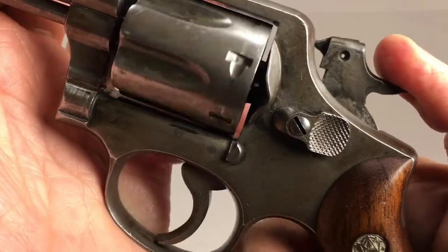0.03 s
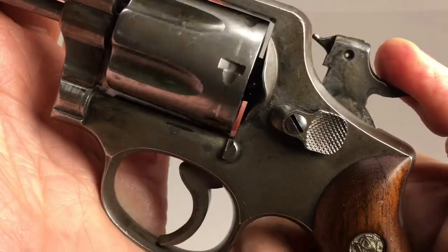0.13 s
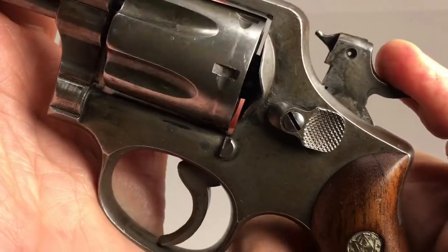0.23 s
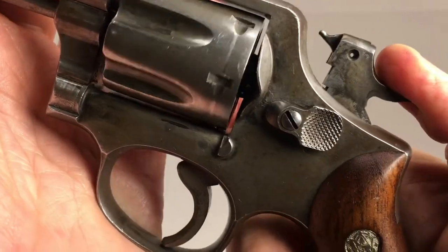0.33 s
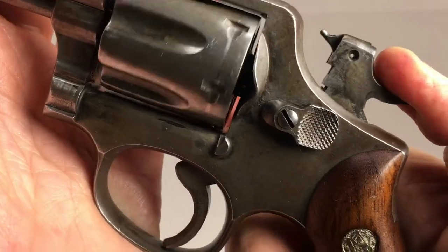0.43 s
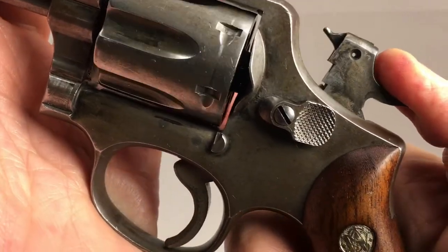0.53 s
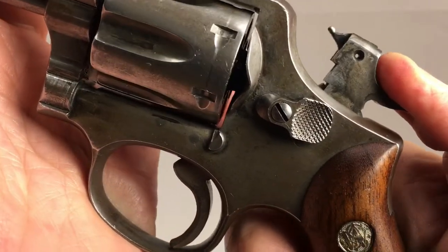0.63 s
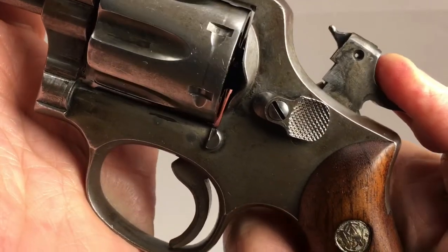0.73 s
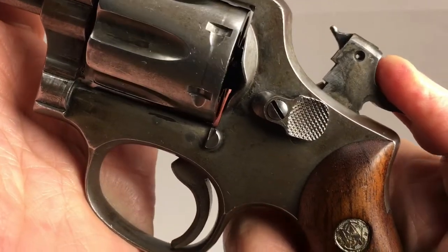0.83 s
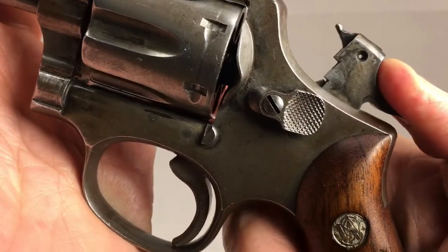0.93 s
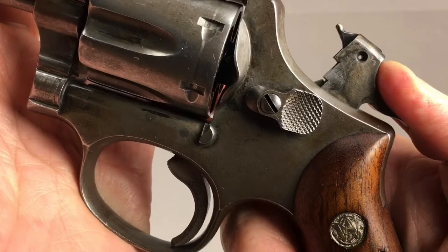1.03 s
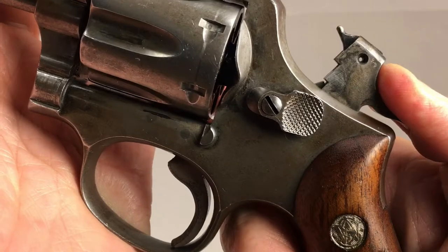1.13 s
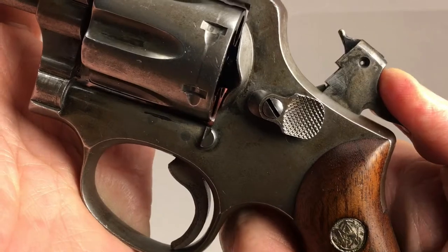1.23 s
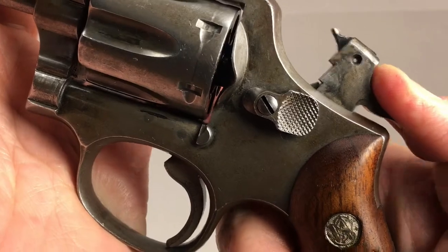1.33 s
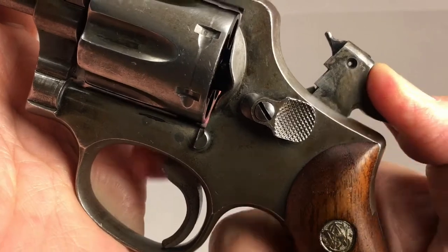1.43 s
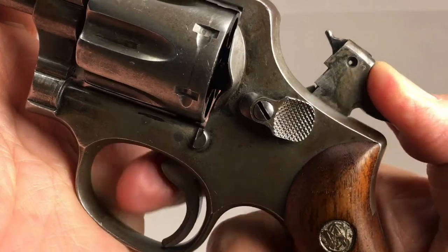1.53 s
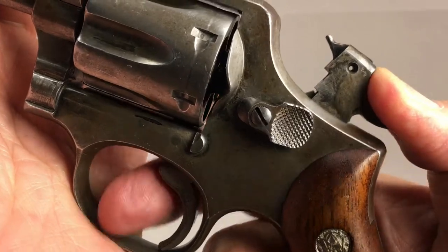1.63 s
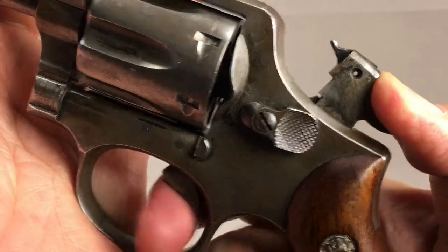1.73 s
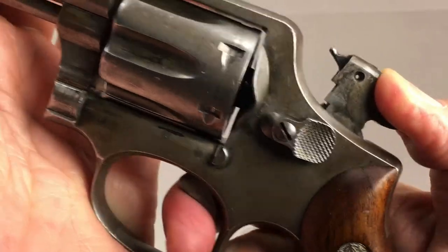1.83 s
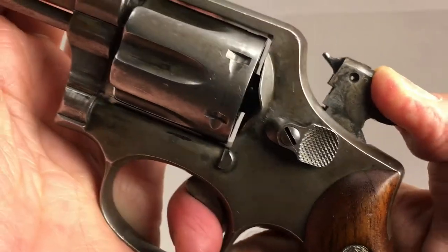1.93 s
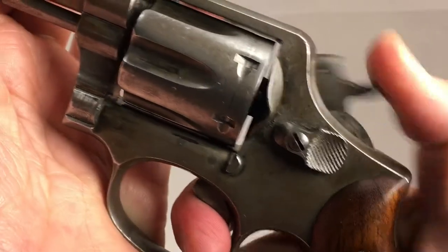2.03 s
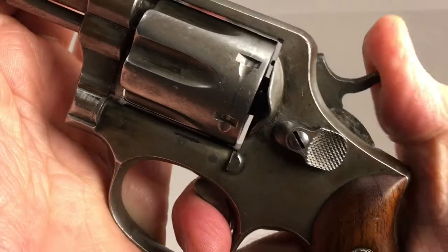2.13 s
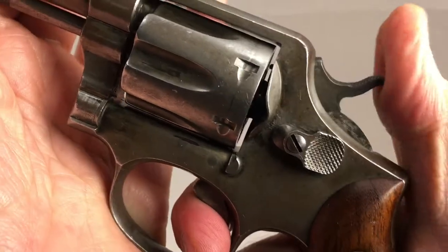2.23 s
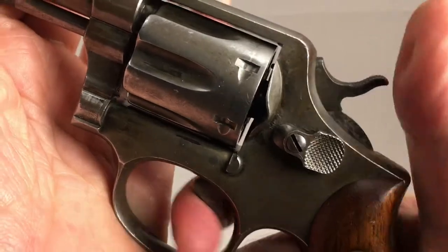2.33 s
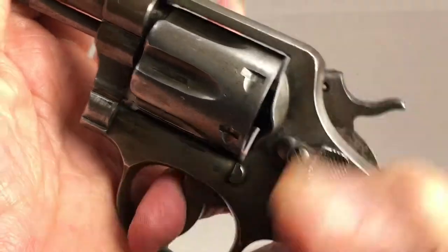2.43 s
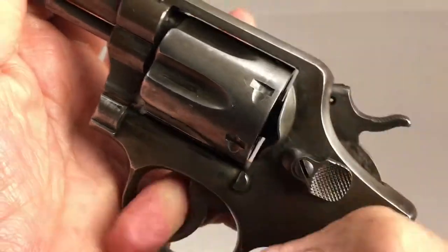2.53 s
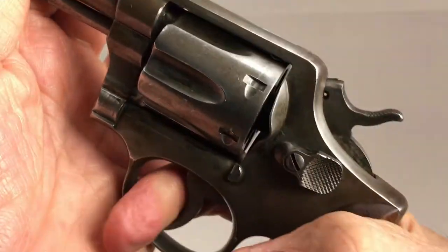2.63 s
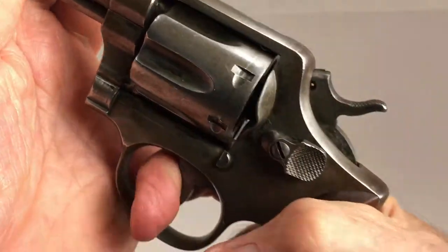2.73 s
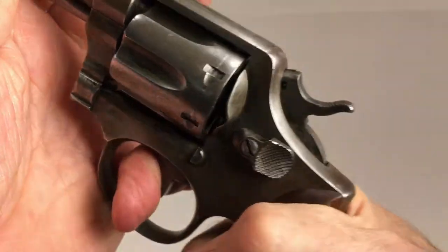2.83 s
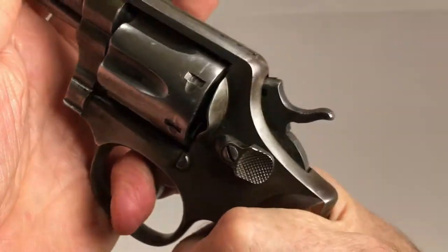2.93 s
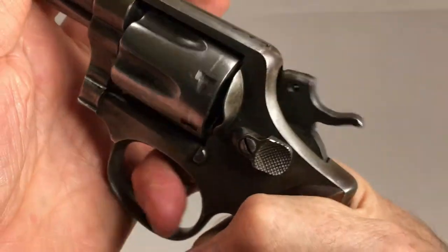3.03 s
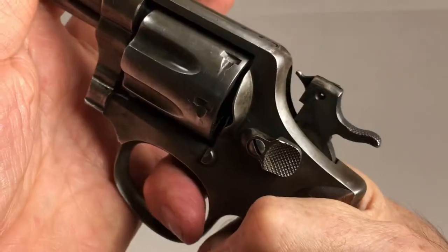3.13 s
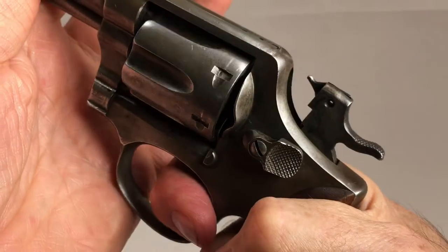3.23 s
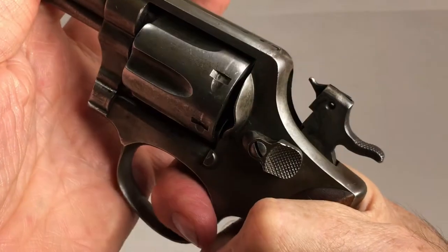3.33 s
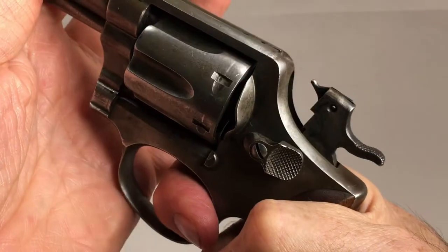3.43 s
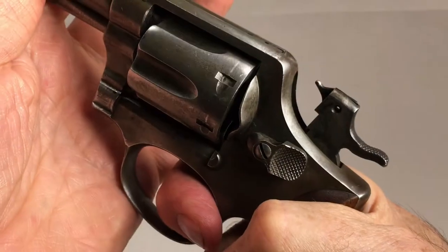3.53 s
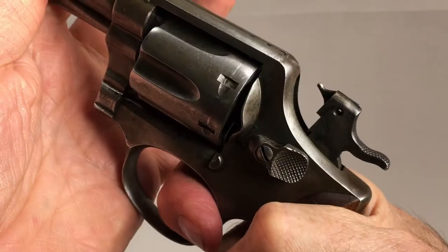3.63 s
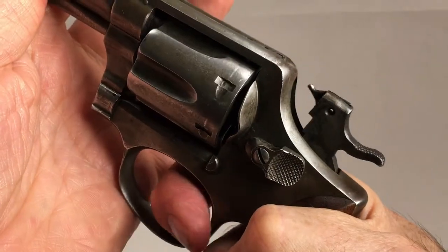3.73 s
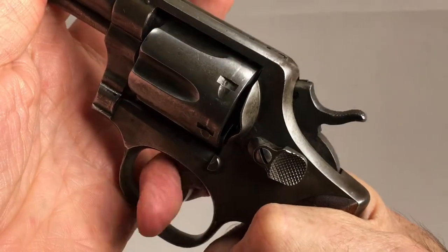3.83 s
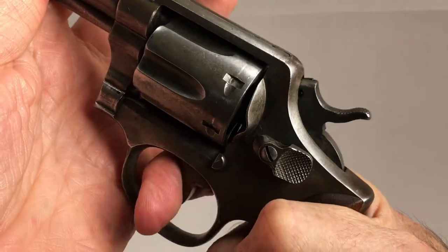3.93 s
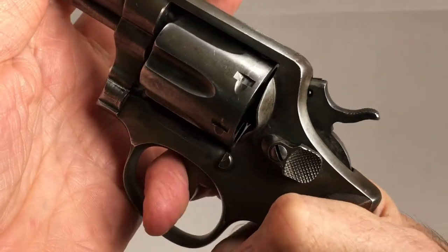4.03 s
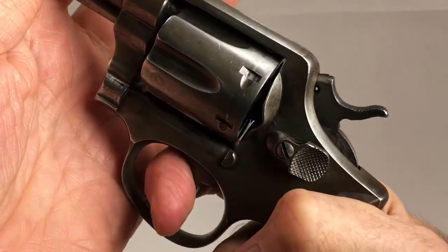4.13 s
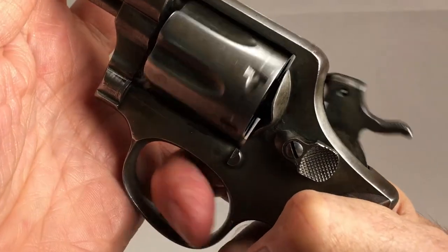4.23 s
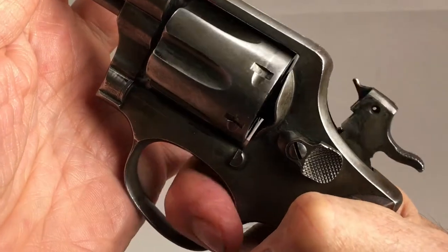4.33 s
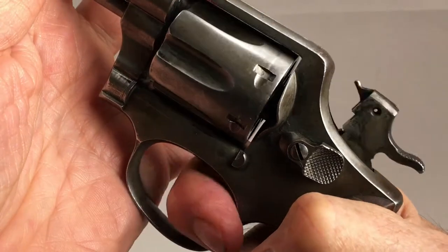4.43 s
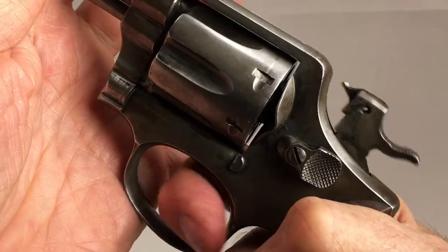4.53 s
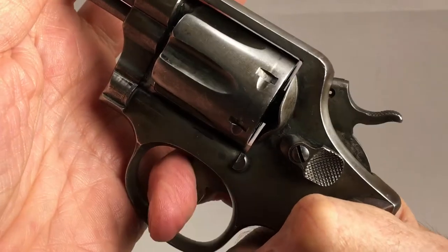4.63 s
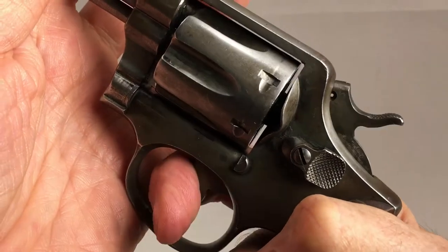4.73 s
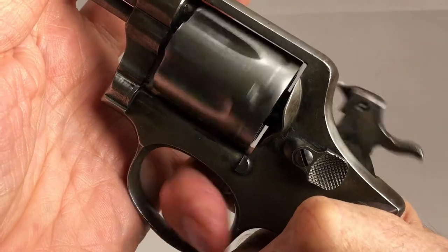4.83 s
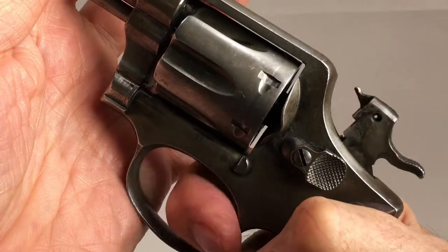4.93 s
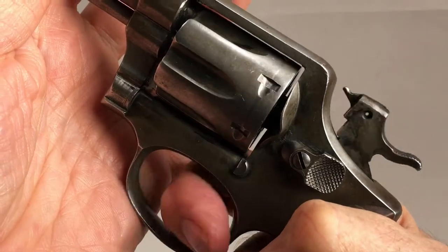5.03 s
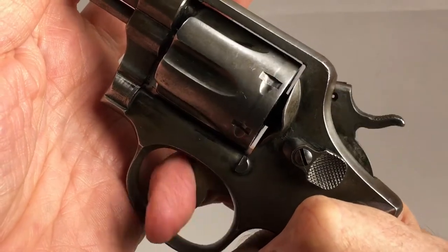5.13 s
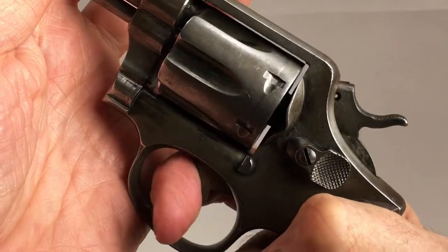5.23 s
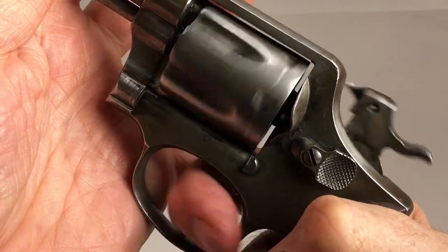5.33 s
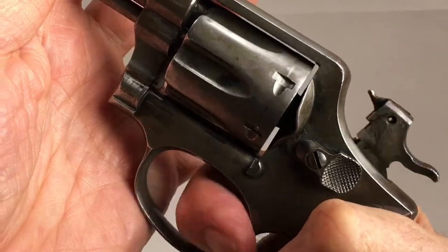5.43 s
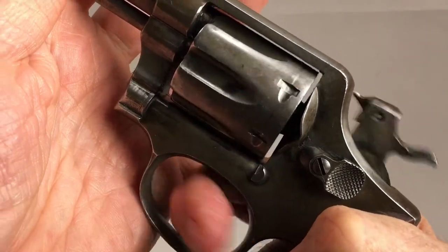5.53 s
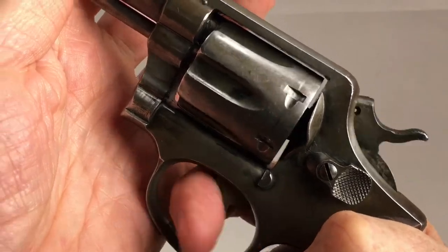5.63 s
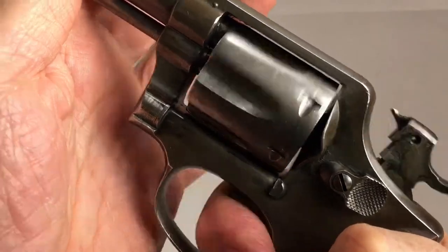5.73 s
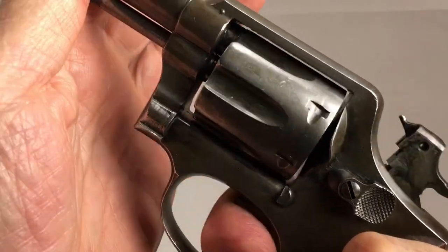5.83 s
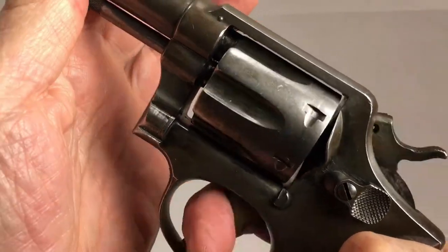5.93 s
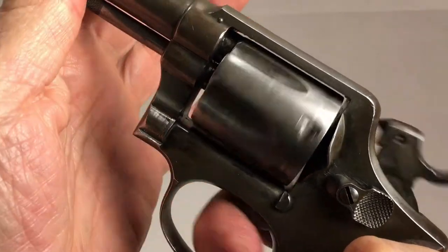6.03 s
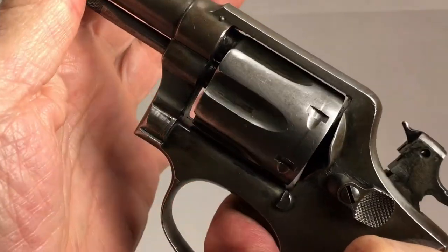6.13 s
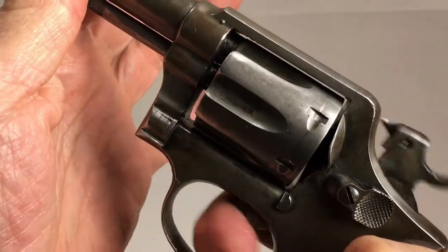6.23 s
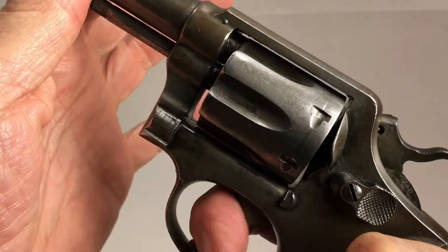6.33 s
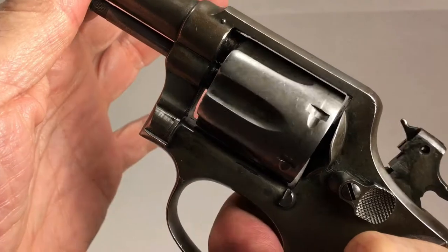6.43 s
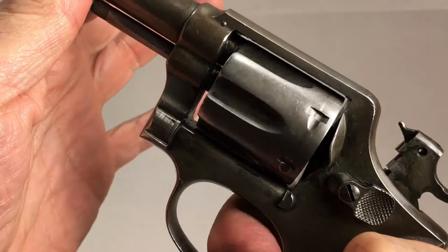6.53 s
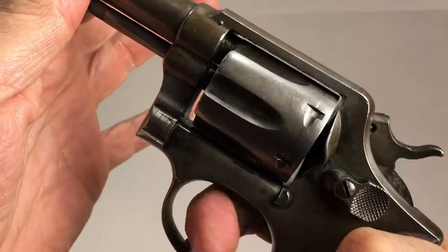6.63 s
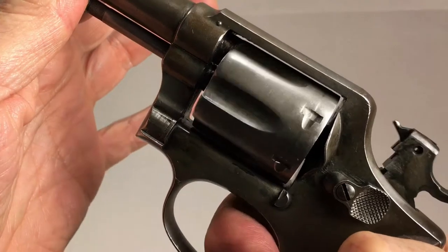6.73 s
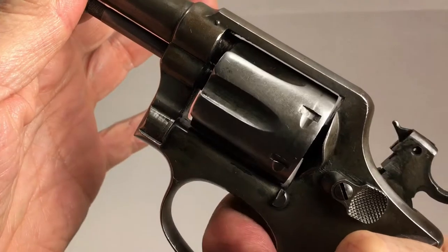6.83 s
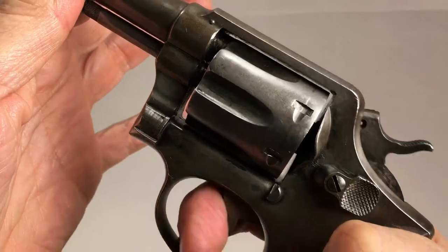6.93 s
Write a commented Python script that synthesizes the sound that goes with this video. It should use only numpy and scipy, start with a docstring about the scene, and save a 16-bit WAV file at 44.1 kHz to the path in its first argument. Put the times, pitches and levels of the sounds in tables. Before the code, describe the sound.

Close up in a quiet room with faint low hum and soft hiss, a revolver's action is worked by hand. Hard metallic clicks with small low thumps land at about 0.3, 0.7 and 0.95 s. Near silence follows, with a tiny tick at 1.4 and a light snap at 1.8. A very sharp, bright click strikes at 2.1, then small ticks lead to a ringing snap at 2.45. Hands bump softly near 2.8 and skin rubs lightly around 2.9 to 3.1. Two dull clacks come at 3.15 and 3.3, a snap at 3.9. From 4.3 the pulls become regular: tight double clacks at 4.3, 4.9, 5.4, 5.8, 6.1, 6.5 and 6.8, each answered by a loud steel snap, at 4.65, 5.2, 5.6, 5.95, 6.3, 6.65 and 6.95, quickening. Fine ticks and rattles fill between, with short faint echoes.

```python
"""A revolver's hammer and trigger are worked by hand close by: steel parts tick, rattle and snap home.
Each touch is a spike and a burst of noise that ring the steel; stops and snaps add a low thump
of falling pitch, strong or faint.
Hands bump and rub softly in a quiet room with faint echoes, a low hum and hiss.
The recorder turns faint bass down after thumps, turns treble down in quiet stretches and limits peaks."""
import sys
import numpy as np
from scipy import signal
from scipy.fft import rfft, irfft
from scipy.io import wavfile
from scipy.ndimage import uniform_filter1d, minimum_filter1d

SR = 44100
rng = np.random.default_rng(int(sys.argv[2]) if len(sys.argv) > 2 else 0)


def to_wav(sig):
    """Store sig (one row per channel, or 1-D mono) as 16-bit WAV at the path in sys.argv[1].

    Samples outside -1..1 are clipped; the rate is SR.
    """
    pcm = np.clip(np.atleast_2d(sig), -1, 1) * 32767
    pcm = np.round(pcm).astype(np.int16)
    wavfile.write(sys.argv[1], SR, pcm.T)  # frames by channels


def boost_factor(decibels):
    """Convert a level in decibels to a linear amplitude factor."""
    exponent = np.asarray(decibels, float) / 20
    return 10 ** exponent


N = 308700  # length in samples: 7 seconds

# The action driven against a hard stop; most pulls stop twice.
# Each row: time in seconds, peak level in dB, brightness in Hz, ping of the part struck in Hz,
# ping level in dB, thump level in dB, time from the blow to the thump's crest in ms.
HARD_STOPS = [(0.3337, -9, 3860, 5380, -2, -13, 3), (0.6928, -10.5, 5520, 7880, 0.5, -18.5, 0.97),
              (0.9574, -6.5, 6300, 5840, 3.5, -38, 3.6), (2.1091, 0, 9570, 8080, -4, -34, 3),
              (3.1559, -9, 7490, 8480, 0.5, -18, 2.2), (3.3252, -8, 3500, 6250, -4, -14, 1.1),
              (4.3293, -7.5, 4695, 7950, 3, -13, 3.1), (4.3541, -5.5, 6040, 5890, 0, -12.5, 2.15),
              (4.915, -8, 5850, 8340, 0, -11.5, 3), (4.935, -3.5, 6370, 3420, 2.5, -12, 3),
              (5.4113, -6, 5350, 7990, 2, -11.5, 3.3), (5.4293, -3.5, 6405, 4250, 0, -15.5, 3.3),
              (5.7901, -7.5, 4100, 2490, 1.5, -11, 3.2), (5.8095, -5, 5850, 6300, 0.5, -15.5, 2.9),
              (6.1231, -9, 4296, 4746, -3.5, -11, 2.3), (6.1395, -0.5, 5000, 5670, 0.5, -14.5, 2.3),
              (6.4764, -8, 5480, 8990, -5.5, -10.5, 2.9), (6.4964, -4, 5900, 5820, 1, -9, 2.9),
              (6.788, -8, 4086, 7900, 0, -11, 3.6), (6.8092, -4.5, 6290, 5850, -1, -14, 3.8)]
# A sprung part snapping home.
# Each row: time in seconds, peak level in dB, ping in Hz, ping level in dB, thump level in dB,
# lead-in touch in dB relative to the snap, time until the rebound in ms.
SPRING_SNAPS = [(1.8151, -21.5, 3900, 8, -45, -10, 3.3), (2.4545, -4.5, 4400, 7.5, -29, -19.5, 2.8),
                (3.8983, -4.5, 6900, -3, -45, -7.5, 1), (4.645, -1, 3880, -4, -24, -10.5, 2),
                (5.1747, 0, 3280, -6, -31, -21.5, 1.7), (5.6215, 0.5, 3970, -5, -29.5, -23, 2.7),
                (5.964, -3.5, 8760, -2, -29, -13.5, 1.2), (6.3269, -0.5, 2800, 6, -29, -14, 0.88),
                (6.6621, -0.5, 2775, 4, -11, -18.5, 2.7), (6.968, -1, 2660, -0.5, -12, -10.5, 2.5)]


def read(hz_points, values, hz):
    """Reads a curve drawn with straight lines on a log-frequency axis."""
    return np.interp(np.log(hz + 1), np.log(np.asarray(hz_points) + 1), values)


def add(mix, s, sound):
    """Mixes a sound in at s seconds."""
    part = mix[round(s * SR):][:len(sound)]
    part += sound[:len(part)]


def mode(hz, centre, width):
    """Response of a resonance: strongest, with gain 1, at its centre."""
    return 1j * hz * width / (centre ** 2 - hz ** 2 + 1j * hz * width)


def stop_contacts():
    """A part that hits a hard stop touches it more than once."""
    # Each row: delay after the blow in ms, level in dB relative to the stop,
    # brightness as a ratio to the stop's, time for the rattle to fall 60 dB in ms.
    touches = [(0, 0.5, 0.97, 2.5), (1.4, -6, 1.1, 8.5)]
    rows = []
    for s, db, bright_hz, ping_hz, ping_db, *_ in HARD_STOPS:
        for ms, less_db, ratio, rattle_ms in touches:
            rows.append((s + ms / 1000, db + less_db, bright_hz * ratio, rattle_ms, ping_hz, ping_db))
    return rows


def snap_contacts():
    """A light part touches first, then the heavy one lands and rebounds; faint grit comes as it creeps."""
    # First light touch: time ahead in ms, level in dB relative to the snap, brightness in Hz,
    # time for the rattle to fall 60 dB in ms.
    first_touch = (7.5, -32, 8300, 7)
    # Second light touch: time ahead in ms, brightness in Hz, rattle time in ms.
    lead_in = (2.4, 12000, 9)
    # Heavy part landing: brightness in Hz, rattle time in ms.
    landing = (8100, 5.5)
    # Its rebound: level in dB relative to the snap, brightness in Hz, rattle time in ms.
    rebound = (-0.14, 7700, 9.8)
    light = (9200, -6)  # ping in Hz and its level in dB
    grit_db, grit_span_ms, grit_hz, grit_rattle_ms = -53.5, 27, 6200, 11
    chance = rng.random((len(SPRING_SNAPS), 3, 3))
    rows = []
    for (s, db, ping_hz, ping_db, _, lead_db, rebound_ms), grit in zip(SPRING_SNAPS, chance):
        heavy = (ping_hz, ping_db)
        touches = [(-first_touch[0], *first_touch[1:], *light),
                   (-lead_in[0], lead_db, *lead_in[1:], *light),
                   (0, 0, *landing, *heavy),
                   (rebound_ms, *rebound, *heavy)]
        for ms, less_db, *colour in touches:
            rows.append((s + ms / 1000, db + less_db, *colour))
        for when, size, pitch in grit:
            ahead_ms = first_touch[0] + when * grit_span_ms
            grain_db = grit_db + 1 - 2 * size  # within 1 dB either way
            grain_ping_hz = grit_hz * 2 ** (pitch - .5)
            rows.append((s - ahead_ms / 1000, grain_db, grit_hz, grit_rattle_ms, grain_ping_hz, 0))
    return rows


def tick_contacts():
    """Small parts tick, each with a fainter slip just before."""
    # Each row: time in seconds, peak level in dB, ping in Hz, ping level in dB.
    ticks = [(0.3106, -47, 3080, -2), (0.9344, -52, 5640, 1), (0.985, -35.5, 6100, 1),
             (1.0384, -47.5, 5770, 7.5), (1.4231, -37, 3920, 14), (2.0868, -48.5, 5500, -1.5),
             (2.1057, -25.5, 3530, 4.5), (2.3959, -20.5, 3410, 11), (2.4237, -37, 8740, 0.5),
             (2.428, -33.5, 8000, -2), (2.4406, -36.5, 4470, 1), (2.4457, -30.5, 3880, 5),
             (2.485, -27.5, 3910, -6), (2.5131, -46.5, 4650, -7), (2.533, -44.5, 4800, 8),
             (2.9506, -36, 3870, 5), (3.0766, -47, 4380, 0), (3.084, -36, 2600, 5),
             (3.0988, -46, 6100, -3.5), (3.1861, -42.5, 6220, -1.5), (3.2604, -50, 6500, 0),
             (3.818, -50, 5680, 2.5), (3.8373, -48.5, 3750, 8.5), (3.885, -41, 5790, 9),
             (4.2911, -31, 3370, 2), (4.6007, -42, 8000, -3.5), (4.612, -37.5, 8100, -2),
             (4.6295, -42, 5540, 0), (4.885, -26.5, 5740, -10), (4.9091, -38.5, 3860, 1),
             (5.3299, -42, 6100, -4), (5.336, -34.5, 8720, -6), (5.3819, -27, 3300, 2.5),
             (5.3972, -33.5, 7900, -3), (5.4581, -31.5, 6030, 17), (5.5971, -40.5, 8360, -2),
             (5.709, -40.5, 6000, -1), (5.756, -31.5, 3270, 1), (5.767, -40, 2580, 14),
             (5.783, -41, 3060, 1), (5.8426, -42, 6010, 2), (5.9353, -38.5, 7700, -3),
             (6.015, -40.5, 3790, 0), (6.0933, -29.5, 3370, 2), (6.115, -41.5, 3100, -1),
             (6.2867, -39.5, 9250, 4), (6.294, -38.5, 7880, 4), (6.444, -33, 2770, 14),
             (6.6399, -30, 7870, 7.5), (6.7392, -39, 9300, 1.5), (6.7558, -30, 2430, 13),
             (6.839, -37, 7520, 6), (6.947, -30, 8000, -1)]
    steel_hz, rattle_ms = 7000, 11
    slip_ms, slip_db = 2.2, -13.5
    rows = []
    for s, db, ping_hz, ping_db in ticks:
        bright_hz = np.sqrt(ping_hz * steel_hz)  # midway in pitch between the two
        colour = (bright_hz, rattle_ms, ping_hz, ping_db)
        rows += [(s - slip_ms / 1000, db + slip_db, *colour), (s, db, *colour)]
    return rows


def clicks():
    """Each touch's spike and rattle ring the steel; returns the near sound and what spreads to the walls."""
    # Ringing tones of frame, cylinder and hammer.
    # Each row: pitch in Hz, width in Hz before the widening below, average level in dB.
    steel = [(1310, 660, -2.5), (2300, 31, -8), (2460, 390, 2), (2830, 35, -1), (3370, 290, -4),
             (3964, 630, -0.5), (5330, 32, -9), (6030, 1000, -7.5), (7250, 16, -12), (8270, 55, -5.5),
             (9300, 150, -13), (9860, 86, -11.5), (10850, 290, -9), (11580, 720, -11.5),
             (12800, 350, -12.5), (13290, 300, -10)]
    # The bare crack of a contact. Each row: frequency in Hz, level in dB.
    crack_curve = [(200, -2.5), (600, -6.5), (1200, -30), (2000, 2.5), (4000, 6), (9000, 3), (13000, -23),
                   (16000, -12)]
    size, keep = 4096, 3000  # samples worked on, samples kept
    t, hz = np.arange(size) / SR, np.fft.rfftfreq(size, 1 / SR)
    mode_hz, width, mode_db = np.transpose(steel)[:, :, None]
    # doubled in dB because the minimum-phase step halves it again
    crack_gain = boost_factor(2 * read(*np.transpose(crack_curve), np.fft.rfftfreq(256, 1 / SR)))
    crack = signal.minimum_phase(irfft(crack_gain, 256)[np.arange(-127, 128)])
    crack, near, far = rfft(crack, size), np.zeros(N), np.zeros(N)
    for s, peak_db, bright_hz, rattle_ms, ping_hz, ping_db in stop_contacts() + snap_contacts() + tick_contacts():
        noise, share = rng.standard_normal(size), rng.standard_normal(mode_hz.shape)
        # quick chatter, then a slower one
        settling = boost_factor(-60 * t / max(rattle_ms / 1000, 1e-3)) + boost_factor(-17.0 - 60 * t / .04)
        rattle = noise * settling
        rattle[0] = -0.94  # the spike of the first touch
        near_db = -4.0 * np.log2(mode_hz / bright_hz) ** 2  # light parts ring high, heavy parts low
        rings = boost_factor(mode_db + near_db + 2.0 * share) * mode(hz, mode_hz, 1.52 * width)
        thin = (1j * hz / (1j * hz + 0.53 * bright_hz)) ** 2  # small contacts push little air low down
        body = rings.sum(0) + boost_factor(-9.5) * crack * thin
        ping = boost_factor(ping_db) * mode(hz, ping_hz, 330)
        shake = rfft(rattle)
        sound = irfft(shake * (body + ping), size)[:keep]
        # the walls hear all sides: a smoother colour
        bare = irfft(shake / abs(shake) * (body + .6 * ping), size)[:keep]
        bare *= boost_factor(-60 * t[:keep] / 0.021)
        # level is set by the strongest 0.4 ms
        sound *= boost_factor(peak_db) / np.sqrt(uniform_filter1d(sound ** 2, size=18).max())
        add(near, s, sound)
        add(far, s, bare * np.linalg.norm(sound) / np.linalg.norm(bare))
    return near, far


def pushes():
    """Lists every thump: blow in seconds, crest in dB, time to crest in ms, knock in dB."""
    rows = []
    for s, _, bright_hz, _, _, db, rise_ms in HARD_STOPS:
        knock_db = db + 3.5 - 4.5 * np.log2(bright_hz / 5000)  # dull blows knock harder
        rows.append((s, db, rise_ms, knock_db))
    for s, _, _, _, db, _, _ in SPRING_SNAPS:
        rows.append((s, db, 2.8, db - 11))
    return rows


def thumps():
    """A short knock, then a pressure swing whose half-cycles double in length, so the pitch drops to the bass."""
    swings, knocks, t = np.zeros(N), np.zeros(N), np.arange(1, 3000) / SR
    for s, crest_db, rise_ms, knock_db in pushes():
        doublings = np.log2(t * 1000 / rise_ms)
        fade_db = -np.where(doublings < 0, 1.5, 2.2) * doublings ** 2 - 60 * t / 0.47
        add(swings, s, boost_factor(crest_db + fade_db) * np.cos(np.pi * 1.01 * doublings))
        add(knocks, s, boost_factor(knock_db - 60 * t / 0.0045) * np.cos(2 * np.pi * 1250 * t))
    hz = np.fft.rfftfreq(N, 1 / SR)
    # the recorder's filter rings faintly near 3.1 kHz before and after each knock
    filter_ring = 2.5 / (1 + ((hz - 3100) / 24) ** 2)
    deep_cut = hz ** 4 / (hz ** 4 + 42 ** 4)
    return irfft(rfft(knocks) * (1 + filter_ring) + rfft(swings) * deep_cut, N)


def coloured(points):
    """Noise with the given spectrum, scaled to an average strength (rms) of 1."""
    x = rfft(rng.standard_normal(N)) * boost_factor(read(*np.transpose(points), np.fft.rfftfreq(N, 1 / SR)))
    x = irfft(x, N)
    return x / x.std()


def handling():
    """Hands shifting on the grip give low bumps with a rustle; skin rubs over steel as shaped noise."""
    # Each row: middle of the bump in seconds, level in dB, pitch in Hz, length in seconds, rustle in dB.
    bumps = [(1.859, -44, 57, .07, -75), (2.446, -52.5, 50, 0.15, -65), (2.77, -38, 61, 0.11, -46.5)]
    # Loudness of the rubbing skin. Each row: time in seconds, level in dB.
    rub = [(2.82, -77), (2.88, -62.5), (2.922, -61), (2.952, -69), (3.05, -85.5), (3.09, -63),
           (3.13, -67.5), (3.15, -80)]
    out = coloured([(2000, -22), (4000, -9), (6000, 2.0), (8000, -5), (16000, -13.5)])
    out *= boost_factor(np.interp(np.arange(N) / SR, *np.transpose(rub), left=-200, right=-200))
    rustle = coloured([(100, 4.5), (500, -13), (1100, -19.5), (3000, -45)])
    for s, db, hz, length, rustle_db in bumps:
        t = np.arange(round(length * SR)) / SR
        low = boost_factor(db) * np.sin(2 * np.pi * hz * t)
        rough = boost_factor(rustle_db) * rustle[round(s * SR):][:len(t)]
        add(out, s - length / 2, np.hanning(len(t)) * (low + rough))
    return out


def room(x):
    """Sparse echoes dying by band; three tails take turns so that alike clicks do not ring alike."""
    # Each row: frequency in Hz, echo level in dB, time for the echoes to fall 60 dB in seconds.
    echo_curve = [(200, -38.5, 0.18), (600, -18, 0.21), (1510, -27.5, 0.25), (3022, -21, 0.33),
                  (6000, -21, 0.3), (9800, -23.5, 0.28), (16000, -23, 0.091)]
    hz_points, level_db, t60 = np.transpose(echo_curve)
    out, turn = np.zeros(N), np.arange(N) / SR * 2.3
    for k in range(3):
        taps = np.zeros(SR // 2)
        at = np.arange(120, SR // 2 - 20, 20)  # one echo at random within every 20 samples
        taps[at + rng.integers(0, 20, len(at))] = rng.choice([-1., 1.], len(at))
        hz, t, z = signal.stft(taps, SR, nperseg=128)
        decay = read(hz_points, t60, hz)[:, None]
        fade = boost_factor(read(hz_points, level_db, hz)[:, None] - 60 * t / decay)
        # long decays are scaled down to balance their energy
        tail = signal.istft(z * fade / np.sqrt(decay * 145), SR, nperseg=128)[1]
        share = np.sqrt(2 / 3) * np.cos(np.pi * (turn + k / 3))
        out += signal.oaconvolve(x * share, tail)[:N]
    return out


def hum():
    """Wavering hum of distant machines: noise in narrow low resonances."""
    # Each row: pitch in Hz, width of the resonance (used twice over) in Hz, average level in dB.
    hums = [(50, 12, -64), (114.7, 24, -67.5), (179.8, 16, -63), (195.8, 6.7, -65), (247, 27, -66.5),
            (360, 39, -80.5)]
    hz, out = np.fft.rfftfreq(N, 1 / SR), np.zeros(N)
    for centre_hz, width, db in hums:
        band = irfft(rfft(rng.standard_normal(N)) * mode(hz, centre_hz, width) ** 2, N)
        out += boost_factor(db) * band / band.std()
    return out


def background():
    """Hum, room tone and microphone hiss as steady noise, falling away at the very bottom."""
    # Colour of the room tone and hiss. Each row: frequency in Hz, relative level per Hz in dB.
    floor_curve = [(18, -32.5), (30, -13.5), (51, -2), (86, -11), (124, -1), (210, -5), (259, -18),
                   (394, -15), (426, -24.5), (554, -22), (844, -23), (988, -27.5), (5040, -32.5),
                   (9460, -36), (16000, -40.5)]
    floor = hum() + boost_factor(-53) * coloured(floor_curve)
    return signal.sosfilt(signal.butter(3, 36, "high", fs=SR, output="sos"), floor)


def scene():
    """Mixes gun, hands, room echoes and background."""
    near, far = clicks()
    low = thumps()
    quiet = background()
    return (near + low + room(far + low) + handling() + quiet)[None]


def trailing(x, seconds):
    """Largest value within the past seconds."""
    size = 2 * round(seconds * SR / 2) + 1
    return -minimum_filter1d(-x, size=size, origin=size // 2, mode="nearest")


def duck(x):
    """Bass gain control: loud bass pulls faint bass down, holds, then lets it climb back."""
    bass = signal.sosfiltfilt(signal.butter(2, 900, fs=SR, output="sos"), x)
    power_db = 10 * np.log10(abs(uniform_filter1d(bass ** 2, size=600)) + 1e-12)
    fall = np.arange(N) / SR * 70  # dB, at 70 dB a second
    held_db = np.maximum.accumulate(trailing(power_db, 0.048) + fall) - fall
    over_db = np.clip(held_db + 37.5, 0, 14)
    faint = np.clip((-42 - power_db) / 6, 0, 1)  # the thump itself passes
    return x - bass * (1 - boost_factor(-.55 * over_db * faint))


def gate(x):
    """The treble opens on a loud click and holds; any sound above the hiss slips through while it lasts."""
    # How far the shut gate turns sound down. Each row: frequency in Hz, gain in dB.
    shut = [(250, 0), (600, -4.5), (1500, -7.5), (5000, -9.5), (16000, -13)]
    held = trailing((abs(x) > boost_factor(-10)) * 1., .41)
    held[:round(.035 * SR)] = 1  # open at the very start
    hz, t, z = signal.stft(x, SR, nperseg=256, noverlap=192)
    treble_power = uniform_filter1d((abs(z[hz > 1500]) ** 2).sum(0), size=5)
    treble_db = 10 * np.log10(treble_power + 1e-14)
    above_db = treble_db - np.percentile(treble_db, 10) - .3  # over the quietest tenth, taken as hiss
    opened = np.maximum(np.clip(above_db / 6, 0, 1), np.interp(t, np.arange(N) / SR, held))
    gain = boost_factor(read(*np.transpose(shut), hz)[:, None] * (1 - opened))
    return signal.istft(z * gain, SR, nperseg=256, noverlap=192)[1][:N]


def limit(x):
    """Peak limiter that looks a millisecond ahead and lets go at once."""
    gain = minimum_filter1d(1 / np.maximum(abs(x) / 0.92, 1), size=61)
    return x * uniform_filter1d(gain, size=61)


def top_cut(x):
    """Nothing passes above the cut-off."""
    return signal.sosfilt(signal.butter(12, 16860, fs=SR, output="sos"), x)


def record(dry):
    """The recorder ducks bass, gates treble, then limits peaks."""
    ducked = duck(dry[0])
    gated = gate(ducked)
    finished = limit(gated)[None]
    return top_cut(finished)


dry = scene()
out = record(dry)
to_wav(out)
```